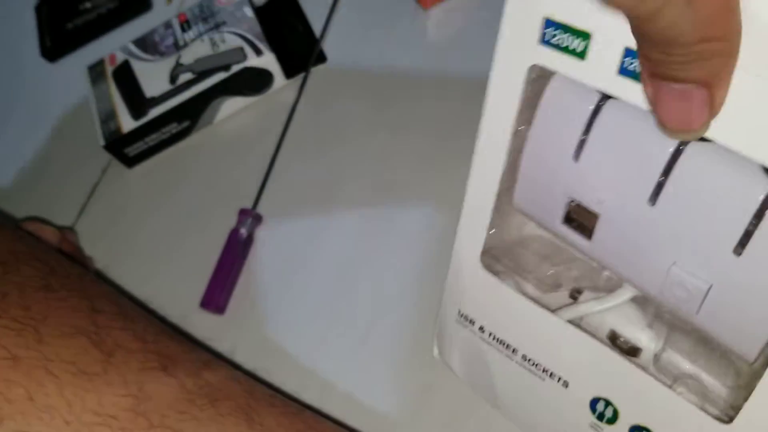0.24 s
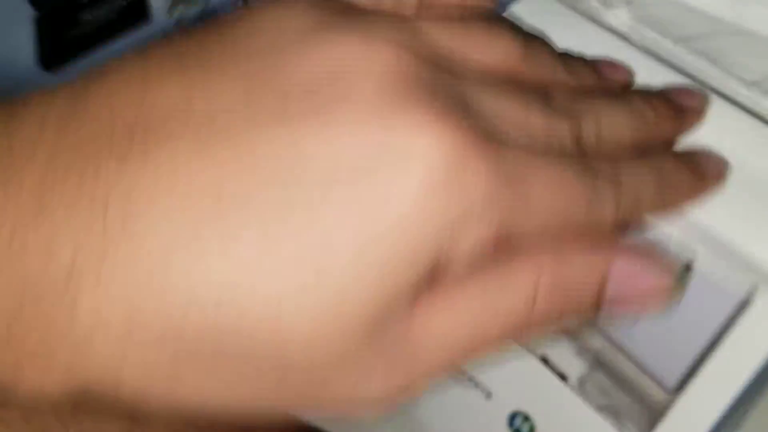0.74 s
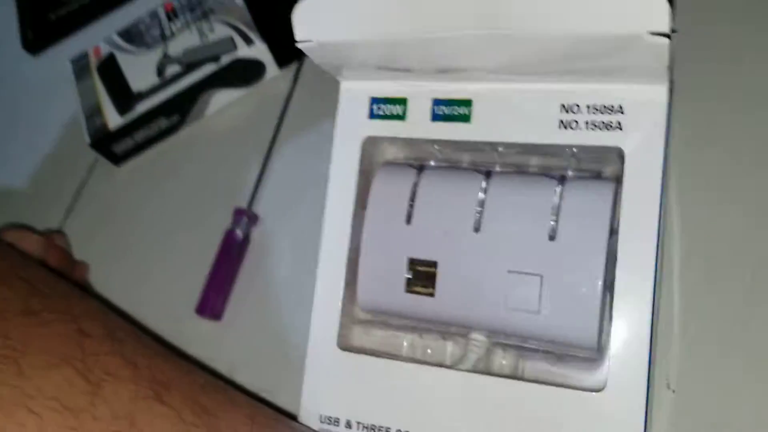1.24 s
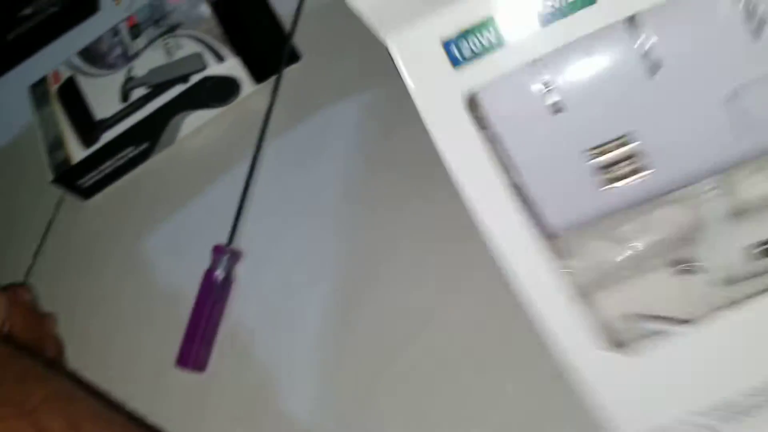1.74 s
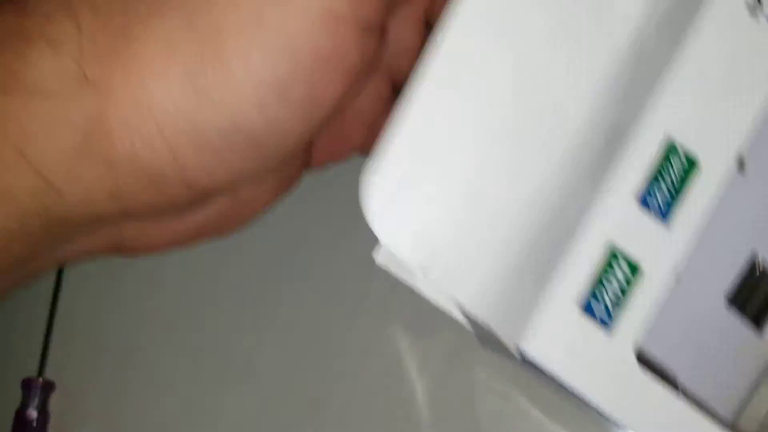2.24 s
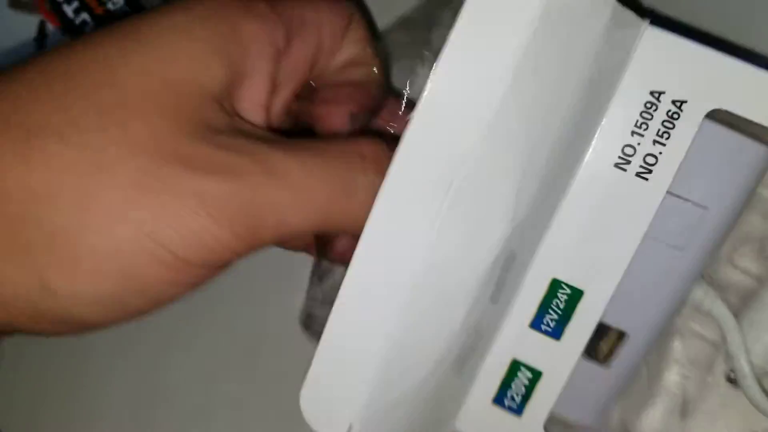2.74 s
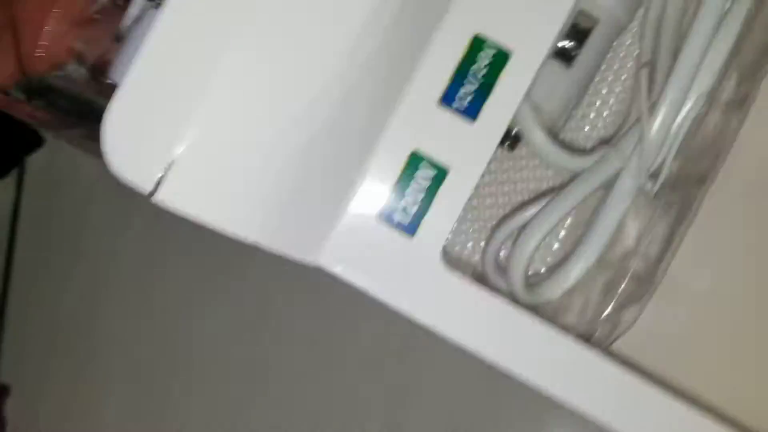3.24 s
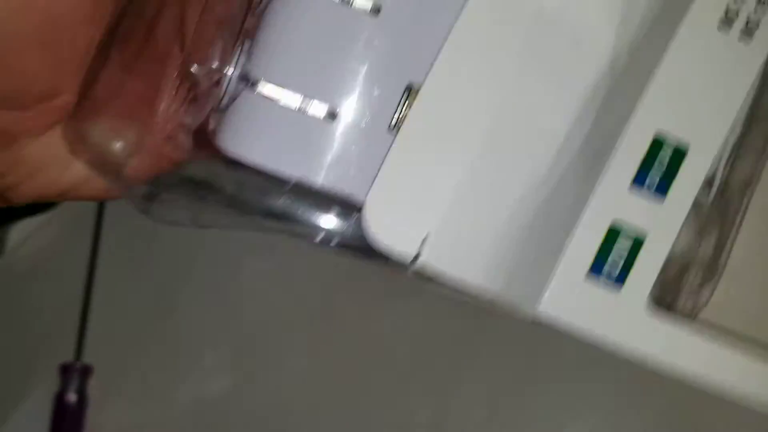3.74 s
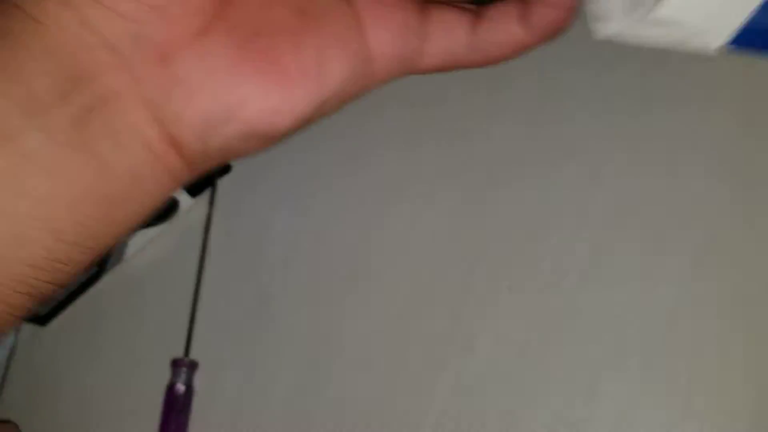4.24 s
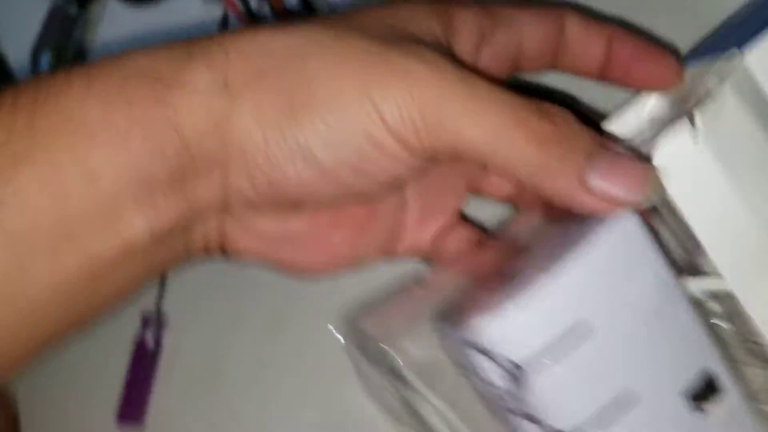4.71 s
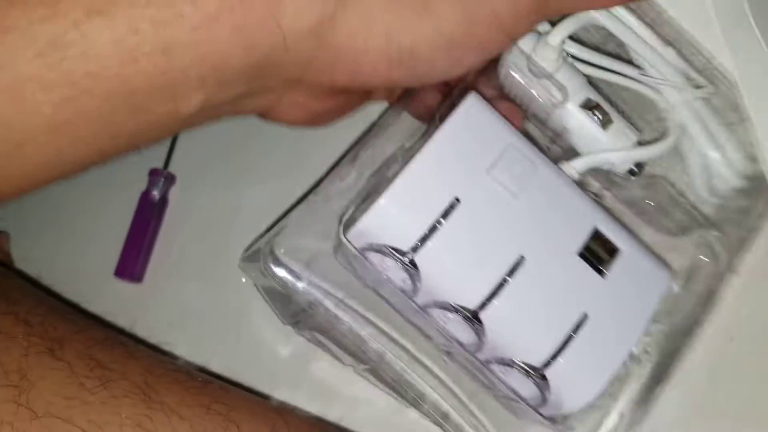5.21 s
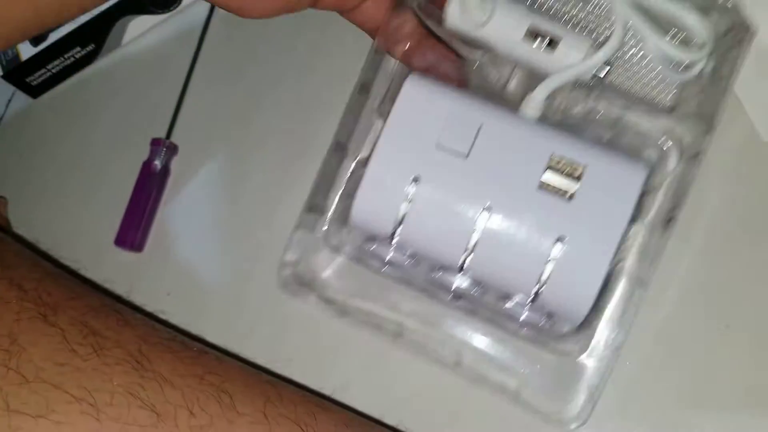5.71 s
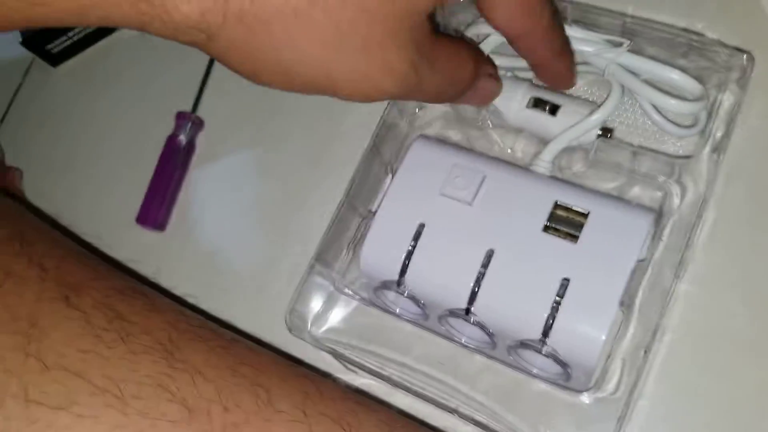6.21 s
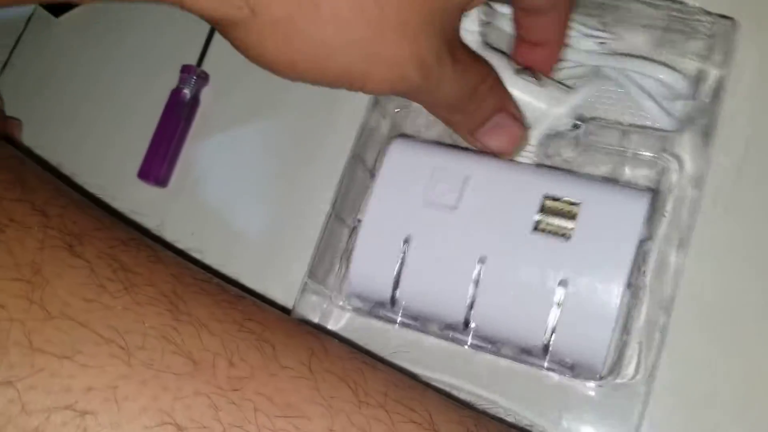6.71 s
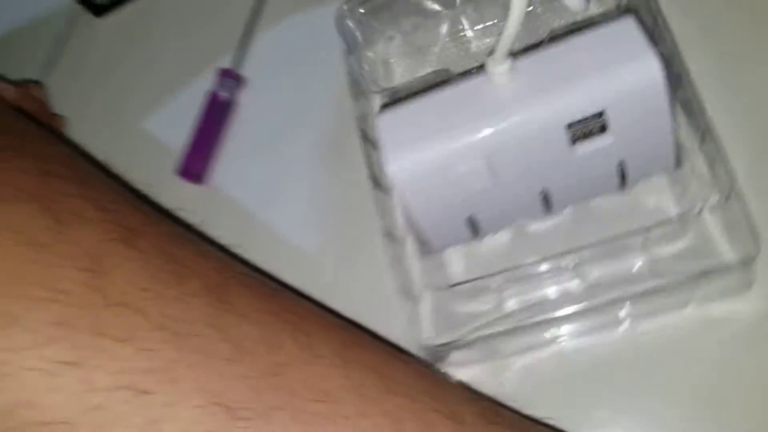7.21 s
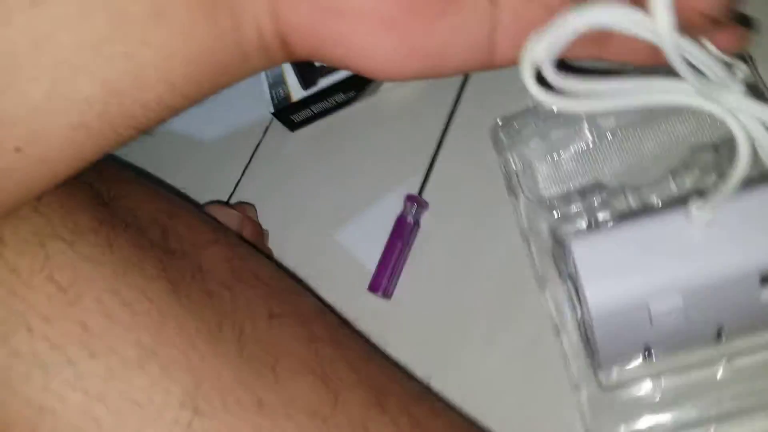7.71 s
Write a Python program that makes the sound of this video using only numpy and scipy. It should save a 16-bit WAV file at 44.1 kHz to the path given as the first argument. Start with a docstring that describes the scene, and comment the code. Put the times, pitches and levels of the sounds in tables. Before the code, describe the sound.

Cardboard and stiff plastic packaging are handled close to a phone microphone in a small tiled room, with a short echo and a faint electrical hum. A sharp snap, a bump and a scrape come right at the start, followed by scattered clicks and rubbing. From about 1.4 to 1.8 seconds the box gives a loud cluster of crackles with tiny squeaks. Between 2 and 4 seconds the plastic tray slides out in short scrapes and separate snaps, with a hollow bump near 3.4 seconds. After a brief lull, crackling builds from 4.5 seconds, and at 5 seconds the tray is set down with a loud knock and a short low drag. More snaps follow until about 5.9 seconds. From 6.4 to 7 seconds fingers pick at the plastic in quick clicks, then only soft rubbing and a few light ticks remain until about 8 seconds.

```python
"""A stiff clear plastic tray is slid out of a cardboard box, set down and picked at.
Card and plastic buckle in snaps that die within milliseconds and shake the hollow pack. Between the
snaps the surfaces rub, scrape and now and then squeak, and the heavy contents bump about inside.
It all happens close to a phone in a small tiled room, which adds a short echo over a quiet hum."""
import sys
import numpy as np
from scipy import signal
from scipy.fft import rfft, irfft
from scipy.io import wavfile

SR = 44100
rng = np.random.default_rng(int(sys.argv[2]) if len(sys.argv) > 2 else 0)


def bounce(signal):
    """Save signal as a 16-bit WAV file at the path given by the first command-line argument."""
    frames = np.transpose(np.atleast_2d(signal))
    limited = np.clip(frames, -1, 1)
    pcm = np.round(limited * 32767).astype(np.int16)
    wavfile.write(sys.argv[1], SR, pcm)


N = 350595
TIME = np.arange(N) / SR


def gain(db):
    """Turn decibels into a number to multiply by."""
    return 10 ** (np.asarray(db) / 20)


def unit(x):
    """Scale a signal so that its average strength (rms) is 1."""
    return x / np.sqrt(np.mean(x ** 2))


def panned(x, pan_db):
    """Make the left side pan_db louder than the right; below zero, the sound leans right."""
    return x * unit(gain(np.array([[pan_db], [-pan_db]]) / 2))


def stereo_noise(size, likeness):
    """Noise for left and right: unrelated at likeness 0, the same at 1."""
    mid, side = rng.standard_normal((2, size))
    return np.sqrt((1 + likeness) / 2) * mid + np.sqrt((1 - likeness) / 2) * np.array([side, -side])


def colour(x, points, size=1024):
    """Shape a sound's tone along a curve of (Hz, dB) points."""
    hz, db = np.transpose(points)
    grid_hz = np.maximum(np.arange(size // 2 + 1) * SR / size, 1)
    curve = gain(np.interp(np.log(grid_hz), np.log(hz), db))
    cepstrum = irfft(np.log(curve))
    cepstrum[1:size // 2] *= 2  # folded forward, so the filter never rings before a hit
    cepstrum[size // 2 + 1:] = 0
    response = irfft(np.exp(rfft(cepstrum)))
    return signal.fftconvolve(x, response[None], axes=1)[:, :x.shape[1]]


def wander(rate, size):
    """A random curve, mostly within -1 to 1, that heads for a new value rate times a second."""
    knots = rng.standard_normal(int(size / SR * rate) + 2)
    return np.interp(np.arange(size) / SR * rate, np.arange(len(knots)), knots)


def add(out, start_s, x):
    """Mix a sound in at its start time."""
    i = max(int(start_s * SR), 0)
    out[:, i:i + x.shape[1]] += x[:, :max(N - i, 0)]


def hit_level(x, db):
    """Scale a hit so that its first hundredth of a second has this level."""
    return x * gain(db) / np.sqrt(np.mean(x[:, :SR // 100] ** 2))


# Where the pack is held. Each row: time in seconds, left minus right level in dB.
PACK_POSITION = [(0, -5.5), (4.6, -5.5), (4.92, -11), (5.18, -10.5), (5.35, -5), (7.95, -4.5)]


def pack_pan(s):
    """Left minus right level of the pack, in dB, at s seconds."""
    return np.interp(s, *np.transpose(PACK_POSITION))


# How hard the hands work the pack. Each row: time in seconds, rubbing in dB, rumble in dB.
HAND_EFFORT = [(0.0, -46, -50), (0.73, -54.5, -53), (1.0, -46, -47), (1.39, -48.5, -47.5),
               (1.59, -42.5, -42.5), (1.79, -44, -48), (2.26, -53.5, -59.5), (3.19, -49, -52),
               (4.27, -53, -56), (4.6, -42, -47.5), (5.05, -46, -44.5), (5.27, -47, -45.5),
               (5.47, -52.5, -52.5), (6.11, -58.5, -57), (6.4, -54.5, -50.5), (6.62, -48.5, -51),
               (7.24, -49, -46.5), (7.95, -48, -49.5)]


def handling(s):
    """The rubbing and rumble levels, in dB, at s seconds."""
    times, rub_db, rumble_db = np.transpose(HAND_EFFORT)
    return np.interp(s, times, rub_db), np.interp(s, times, rumble_db)


# The tones of rubbing: rasp, fine hiss and low rumble. Each row: frequency in Hz, level in dB.
RASP_TONE = [(50, -9.5), (200, -1.5), (550, -7), (800, 4.5), (1100, -0.5), (1500, -2), (2000, -1),
             (2800, -3), (4000, -8.5), (6000, -19), (9000, -44.5)]
HISS_TONE = [(2000, -26), (5000, 3.5), (6500, -1), (8500, -4), (11500, -3.5), (15500, -1.5), (20000, 6.5)]
RUMBLE_TONE = [(20, -39), (55, -52), (85, -22.5), (150, -7.5), (220, -8.5), (285, 6.5), (340, -5.5),
               (450, 0), (620, -15), (1200, -35)]


def rubbing(hiss_offset_db=-5):
    """Fingers, card and tray slide over each other: tiny slips rasp and hiss, and the pack rumbles."""
    rub_db, rumble_db = handling(TIME)
    slips = grains(per_second=180, spread_db=3, decay_s=0.004, steady=0.4)
    friction = stereo_noise(N, 0.14) * slips + 0.28 * chatter(count=5000)
    rasp = unit(colour(friction, RASP_TONE)) * gain(rub_db)
    fine_friction = stereo_noise(N, 0.05) * (slips + 0.51)
    hiss = unit(colour(fine_friction, HISS_TONE)) * gain(rub_db + hiss_offset_db)
    rumble = unit(colour(stereo_noise(N, 0.99), RUMBLE_TONE, size=8192))
    rumble *= gain(rumble_db + 2.4 * wander(35, N))
    return panned(rasp, -3.5) + panned(hiss, -1.15) + panned(rumble, -5.5)


def grains(per_second, spread_db, decay_s, steady):
    """The strength of friction: many tiny slips, a few much larger, over an even drag."""
    size = gain(spread_db * np.minimum(rng.exponential(size=N), 4))
    slips = (rng.random(N) < per_second / SR) * size ** 2
    power = signal.lfilter([1], [1, -np.exp(-1 / (decay_s * SR))], slips)  # each slip dies away
    return unit(np.sqrt(power / power.mean() + steady))


def chatter(count, ring_s=0.0058, spread_db=3):
    """Tiny slips each ring one brief note of the bent sheet, so the pitches keep shifting."""
    out, t = np.zeros((2, N)), np.arange(SR // 40) / SR
    rise_s = lag_range_s = 20 / SR
    fade = np.exp(-t / ring_s) * (1 - np.exp(-t / rise_s))
    for when, pitch, size, lag in rng.random((count, 4)):
        hz = 600 + 6400 * pitch ** 1.5
        lead_s = np.array([[0], [lag_range_s * (lag - 0.5)]])  # the right side is early or late
        strength = gain(-spread_db * np.log(1 - 0.98 * size))
        add(out, when * N / SR, strength * np.sin(2 * np.pi * hz * (t + lead_s)) * fade)
    return unit(out)


def hum(hz=60, db=-75):
    """Mains electricity hums faintly, wavering in level."""
    tone = unit(np.sin(2 * np.pi * hz * TIME))
    return panned(gain(db + 1.1 * wander(7.6, N)) * tone, -7)


# The tones of a snap: the hollow pack's boom, the bending panel, a sharp crack and a high sizzle.
# Each row: frequency in Hz, level in dB.
BODY_TONE = [(50, -41.5), (130, -19.5), (210, -7.5), (290, 3.5), (420, 0.5), (620, -5.5), (900, -17.5),
             (2000, -70)]
PANEL_TONE = [(200, -39.5), (550, -11), (800, 5), (1050, -3), (1400, 3.5), (1900, -1), (2900, -1),
              (3600, -9), (7000, -65.5)]
CRACK_TONE = [(1200, -74.5), (2700, -4), (3400, 3), (5000, 3), (6500, 0), (8000, -11), (12000, -29.5)]
SIZZLE_TONE = [(3000, -89), (7000, -1.5), (8700, -3), (11500, 4), (15500, 1.5), (20000, -8)]
# The loud buckles and taps. Each row: start in seconds, level in dB, ringing pitch in Hz, then body,
# crack and sizzle in dB compared with that level, and the share of the panel's sound that rings (0-1).
BUCKLES = [(0.0133, -20, 1870, -4, -9, -15, .05), (0.0421, -25.5, 840, -13, -7, -19, .5),
           (0.0515, -32, 990, -15, -5, -18, 0.85), (.265, -40.5, 1810, -7, -8, -22, 0.27),
           (0.2918, -36, 1290, -12, -16, -26, 0.31), (.3119, -27.5, 3170, -18, -6, -18, .3),
           (0.3678, -25.5, 1340, -10, -3, -1, 0.43), (0.3827, -22.5, 3020, -14, -6.5, -12, 0.09),
           (0.8739, -33.5, 2080, -3, -8, -25, .1), (0.9659, -28, 1350, 1.5, -11, -23, 0.5),
           (.9726, -25, 850, -14, -16, -26, 0.54), (1.0022, -31.5, 950, -3, -10.5, -13, 0.45),
           (1.0624, -39, 1650, -11, -6.5, 0, 0.16), (1.1946, -34, 1830, -5.5, -11, -6.5, .35),
           (1.3794, -32.5, 1770, 1, -20, -25, 0.41), (1.3878, -27, 1680, -8, -14, -16, 0.5),
           (1.3929, -23.5, 1470, -8, -15, -12, 0.19), (1.461, -32, 1770, -10, -1, -10, .1),
           (1.5014, -24.5, 2420, -25, -3, -4, 0.17), (1.5362, -23.5, 3320, -12, -12, -23, .1),
           (1.5473, -25, 1840, -18, -10, -18, 0.4), (1.669, -28.5, 1280, -26, -6, -6, .05),
           (1.6766, -15, 2480, -19, -15, -14, .7), (1.695, -15.5, 2410, -29, -13.5, -34, 0.59),
           (1.7114, -22, 1415, -12, -22, -25, 1), (1.7506, -18.5, 1410, -16, -8, -2.5, 0.94),
           (1.9686, -33, 1540, -13, -20, -30, .75), (2.049, -21.5, 1590, -12.5, -14, -25, 0.24),
           (2.2578, -26.5, 3170, -8, -9.5, -21, 0.12), (2.4487, -34, 840, -10, -12.5, -12, 0.28),
           (2.697, -34.5, 2190, -27, -7, -13, .5), (2.9041, -25, 1520, -21, -3.5, -8.5, 0.27),
           (2.9717, -33.5, 2700, -14, -4.5, -7, 0.17), (3.0193, -32.5, 770, -8, -12, -30, 0.52),
           (3.0314, -30.5, 735, -6.5, -12, -18, 0.54), (3.218, -20.5, 2330, -14.5, 3.5, 0, 0.4),
           (3.328, -33, 2930, -25, -7.5, -23, .15), (3.3456, -29.5, 900, -4, -10, -19, 0.55),
           (3.371, -28, 3110, -13, -4.5, -19, .8), (3.5211, -36, 2540, -10, -14, -29, 0.85),
           (3.6887, -31, 830, -12, -12, -16, 0.78), (3.723, -40.5, 2400, -5, -7, -9, 0.43),
           (3.7425, -39, 1450, -14, -12, -28, 0.35), (3.8848, -34, 2880, -8.5, -1.5, -5, .3),
           (3.9481, -36, 1480, -13, -6, -13, 0.11), (4.1117, -45.5, 1000, -13, -16, -28, .55),
           (4.4597, -38.5, 1110, 1, -3.5, -6, 0.9), (4.563, -40, 930, -8, -3, -10, 1),
           (4.657, -27, 3320, -20, 2, 2, .1), (4.6629, -26, 2210, -4, 5, -1, 0.36),
           (4.748, -31.5, 2870, -10, -4.5, -26, 0.74), (4.9102, -27, 2940, -4, -12, -29, 0.82),
           (4.946, -33, 2350, -17, -11, -24, .3), (4.9753, -17, 3070, -3.5, -12, -17, .4),
           (4.981, -26, 820, -6, -23, -27, 1), (4.995, -23.5, 2970, -29, 6.5, -4, 0.78),
           (5.118, -31, 800, -16, -14, -33, 0.43), (5.1705, -24.5, 2350, -8.5, 7, -5, 0.57),
           (5.3388, -27.5, 910, -6.5, -10, -18, 0.55), (5.344, -28.5, 3080, -5, 6, -4.5, 0.37),
           (5.388, -29, 960, -1.5, -16, -19, 0.78), (5.403, -30, 810, -5, -30, -24, 0.4),
           (5.5925, -33, 2850, -4, -15, -25, 0.054), (5.7324, -36, 1376, -9, -7, -6.5, .55),
           (5.799, -26, 3000, -7.5, -1.5, -8, 0.45), (5.826, -31, 1460, -9, -6, -8, .2),
           (5.8734, -21, 1030, -10, -6.5, -12, 0.11), (6.154, -42, 2130, -5.5, -14, -19, 0.11),
           (6.3633, -38.5, 2760, -21, -9, -22, .4), (6.3828, -31, 2820, -24, -11.5, -27, 0.53),
           (6.4075, -30, 3010, -10.5, -2, -9.5, .3), (6.476, -33, 1350, -0.5, -11, -22, .25),
           (6.5018, -27.5, 2860, -7, -1, -20, 0.44), (6.5279, -28.5, 910, -2, -4, -15, .1),
           (6.582, -35.5, 1525, -9, -5, -21, 0.66), (6.6135, -38.5, 2520, -3, -7, -13, 0.39),
           (6.705, -26.5, 950, -6.5, -12, -20, 0.4), (6.727, -29, 3000, -23, -0.5, -16, 0.09),
           (6.7525, -29, 1284, -4, -8, -28, 0.33), (6.7751, -30, 1460, -15, 2, 1.5, 0.31),
           (6.8108, -34, 2860, -6, -11, -26, 0.48), (6.869, -26.5, 2760, -7, -4, -27, .3),
           (6.8982, -35, 1320, -24, -4.5, -11, .3), (6.999, -35, 1850, -6.5, -10, -16, .2),
           (7.4271, -49.5, 1370, -13, 2, -1, .15), (7.5744, -41.5, 1420, -8, -8, -9, .2),
           (7.7495, -36.5, 2100, -6, -8, -12.5, 0.17)]


def snaps(middling_decay_s=0.0018, middling_db=-28, halving_db=25, body_s=0.0086):
    """A buckle shakes the sheet in a burst of noise; one note stands out and the hollow pack booms."""
    out, t = np.zeros((2, N)), np.arange(SR // 14) / SR
    flutter = gain(-23) * np.exp(-t / 0.018)  # the rest of the sheet shivers on
    for s, db, hz, body_db, crack_db, sizzle_db, ring_share in list(BUCKLES) + crinkles():
        decay_s = middling_decay_s * 2 ** ((middling_db - db) / halving_db)  # harder is over sooner
        onset = 1 - np.exp(-(t / (0.38 * decay_s)) ** 2)  # a slow buckle also starts softly
        fade = onset * (np.exp(-t / decay_s) + flutter)
        ring_fade = onset * np.exp(-t / (1.84 * decay_s))
        body_fade = onset * np.exp(-t / body_s)
        phase = 2 * np.pi * np.cumsum(hz * (1 + 0.029 * wander(890, len(t)))) / SR
        ring = hit_level((np.sin(phase) * ring_fade)[None], 0)
        panel = hit_level(colour(stereo_noise(len(t), 0.35) * fade, PANEL_TONE), 0)
        body = hit_level(colour(stereo_noise(len(t), 0.96) * body_fade, BODY_TONE), body_db)
        crack = hit_level(colour(stereo_noise(len(t), 0.054) * fade, CRACK_TONE), crack_db)
        sizzle = hit_level(colour(stereo_noise(len(t), 0.054) * fade, SIZZLE_TONE), sizzle_db)
        sheet = np.sqrt(ring_share) * ring + np.sqrt(1 - ring_share) * panel + body + crack
        add(out, s, gain(db) * (panned(sheet, pack_pan(s)) + panned(sizzle, 0.26 * pack_pan(s))))
    return out


def strain(swell_s=0.0018, offset_db=-14):
    """Each loud snap opens with a creak of a few milliseconds, just before the sheet gives way."""
    levels, t = np.zeros((3, N)), np.arange(SR // 80) / SR
    swell = np.exp((t - t[-1]) / swell_s)
    for s, db, _, _, crack_db, sizzle_db, _ in BUCKLES:
        peaks = gain(db + offset_db + np.array([0, crack_db, sizzle_db]))
        add(levels, s - t[-1], np.outer(peaks, swell))
    noise = stereo_noise(N, 0.67)
    tones = (PANEL_TONE, CRACK_TONE, SIZZLE_TONE)
    return sum(level * unit(colour(noise, tone)) for level, tone in zip(levels, tones))


def crinkles(count=26, low_hz=798, high_hz=3130, body_db=-7.5, crack_db=-6.5, sizzle_db=-8):
    """Faint buckles at random moments, as strong as the hands press; gives rows like those in BUCKLES."""
    rows = []
    for when, force, pitch, ringing in rng.random((count, 4)):
        s = when * N / SR
        rub_db, _ = handling(s)
        db = rub_db + 0.5 + 3 * (2 * force - 1)  # just above the rubbing, give or take 3 dB
        hz = low_hz * (high_hz / low_hz) ** pitch
        rows.append((s, db, hz, body_db, crack_db, sizzle_db, 0.3 * ringing))
    return rows


# Bumps inside the pack. Each row: start in seconds, pitch in Hz, level in dB, decay time in seconds.
BUMPS = [(0.013, 265, -31, 0.011), (3.373, 236, -25, 0.0066), (4.977, 270, -17, 0.008),
         (5.158, 228, -35, 0.017), (6.526, 448, -30, 0.014)]


def thuds():
    """The heavy contents bump the box and ring its lowest note."""
    out, t = np.zeros((2, N)), np.arange(SR // 8) / SR
    for s, hz, db, decay_s in BUMPS:
        onset = 1 - np.exp(-2 * hz * t)
        boom = np.sin(2 * np.pi * hz * t) * onset * np.exp(-t / decay_s)
        add(out, s, panned(gain(db) * boom, pack_pan(s)))
    return out


# Scrapes of card, tray and fingers. Each row: time of the hardest push in seconds, length in seconds,
# level in dB, hiss in dB compared with that level.
SCRAPES = [(0.042, 0.042, -29, -11.5), (0.178, 0.026, -40, -23), (0.316, 0.016, -36.5, 6),
           (0.387, 0.026, -34, -7), (0.703, 0.02, -42.5, 0.5), (0.879, 0.089, -36.5, -4),
           (0.939, 0.02, -40.5, -5), (0.971, 0.044, -31.5, -26), (1.204, 0.015, -40.5, -12),
           (1.277, 0.017, -49.5, 6.5), (1.418, 0.053, -28.5, -7.5), (1.51, 0.021, -28, -12),
           (1.55, .042, -31.5, -8.5), (1.667, 0.026, -31.5, -12), (1.785, 0.052, -42.5, 9),
           (2.013, 0.021, -56, 6), (2.271, 0.028, -31.5, -13.5), (2.347, 0.054, -50.5, 2),
           (2.501, 0.069, -40.5, -13.5), (2.719, 0.039, -31.5, -18.5), (2.858, 0.02, -44, 0.5),
           (2.922, 0.048, -42, -1), (3.038, 0.032, -33, -1.5), (3.1, 0.026, -36.5, -8),
           (3.236, 0.032, -34.5, -4), (3.357, 0.019, -34, -19), (3.509, 0.073, -42, -10),
           (3.782, 0.073, -42.5, -5), (3.973, 0.045, -43, -10), (4.238, 0.034, -50, -4),
           (4.358, 0.033, -40.5, -6), (4.459, .025, -37, -17), (4.665, 0.047, -28.5, -12),
           (4.732, 0.039, -37.5, -15), (4.914, 0.051, -30, -15), (5.154, 0.069, -29, -12.5),
           (5.4, 0.024, -35, -21), (5.85, 0.058, -44, -26), (6.521, .07, -35, -11),
           (6.725, 0.043, -31, -16), (7.155, 0.043, -44.5, -10)]


def scrapes(swell_share=0.37, body_db=-6):
    """A push swells and dies; its gritty slips rasp, hiss and shake the hollow pack."""
    push, hiss_level = np.zeros((2, N))
    for s, length_s, db, hiss_db in SCRAPES:
        swell_s, fade_s = swell_share * length_s, (1 - swell_share) * length_s
        near = slice(max(int((s - 0.2) * SR), 0), int((s + 0.3) * SR))
        from_peak_s = TIME[near] - s
        stroke = gain(db) * np.exp(-np.maximum(-from_peak_s / swell_s, from_peak_s / fade_s))
        push[near] += stroke
        hiss_level[near] += gain(hiss_db) * stroke
    slips = grains(per_second=700, spread_db=2.5, decay_s=0.00089, steady=0.14)
    friction = stereo_noise(N, 0.31) * slips + 0.71 * chatter(count=4500)
    rasp = unit(colour(friction, RASP_TONE))
    body = gain(body_db) * unit(colour(stereo_noise(N, 0.94) * slips, BODY_TONE, size=4096))
    hiss = hiss_level * unit(colour(stereo_noise(N, 0.034) * (slips + 0.2), SIZZLE_TONE))
    grit = 0.99 * np.sqrt(push * hiss_level) * unit(colour(friction, CRACK_TONE))
    lean = gain(np.array([[0.5], [-0.5]]) * pack_pan(TIME))  # left and right follow the pack
    lean /= np.sqrt(np.mean(lean ** 2, axis=0))
    return lean * (push * (rasp + body) + grit) + panned(hiss, -1.8)


# Edges that stick and sing. Each row: start in seconds, length in seconds, pitch in Hz, level in dB,
# waver as a share of the pitch.
STICKING_EDGES = [(1.38, 0.018, 1840, -32.5, 0.065), (1.678, 0.033, 2400, -37, 0.074),
                  (1.76, 0.017, 1353, -29.5, 0.052), (2.387, 0.025, 10570, -46, 0.02),
                  (6.998, 0.036, 919, -35, 0.017)]


def squeaks(rough_db=4):
    """An edge sticks and slips at a wavering pitch and with uneven force."""
    out = np.zeros((2, N))
    for s, length_s, hz, db, waver in STICKING_EDGES:
        size = int(length_s * SR)
        progress = np.arange(size) / size
        phase = 2 * np.pi * np.cumsum(hz * (1 + waver * wander(900, size))) / SR
        force = np.sqrt(progress) * (1 - progress) * gain(rough_db * wander(524, size))
        add(out, s, panned(gain(db) * unit(np.sin(phase) * force), pack_pan(s)))
    return out


def drag(peak_s=5.03, swell_s=0.21, db=-45):
    """The loaded tray is pushed along the floor and rumbles."""
    rumble = colour(stereo_noise(N, 0.93), [(20, -14), (110, -7.5), (220, 0), (700, -38)], size=4096)
    swell = np.exp(-((TIME - peak_s) / swell_s) ** 2)
    return panned(gain(db) * unit(rumble) * swell, -7)


# The tiled room's echo. Each row: middle of a band in Hz, seconds to fade by 60 dB, level in dB.
ECHO_BANDS = [(149, 0.14, -8), (298, 0.32, -5.5), (610, 0.27, -6), (1180, 0.21, -3.5), (2330, 0.27, -6),
              (4900, 0.49, -9.5), (9500, 0.65, -11), (15000, 0.31, -10)]


def room(x, gap_s=0.0017, early_db=4, early_s=0.015, alike_hz=900):
    """Floor and near walls answer first, then a smooth tail; low notes reach both sides alike."""
    t = np.arange(SR // 2) / SR
    hz, fade_s, db = np.transpose(ECHO_BANDS)
    log_hz = np.log(np.maximum(np.arange(len(t) // 2 + 1) * SR / len(t), 1))
    onset = 1 - np.exp(-(t / gap_s) ** 4)
    early_boost = 1 + gain(early_db) * np.exp(-t / early_s)
    response = 0
    for k, this_band in enumerate(np.eye(len(hz))):
        fade = onset * early_boost * np.exp(-np.log(1000) * t / fade_s[k])
        spectrum = rfft(stereo_noise(len(t), likeness=1 / (1 + (hz[k] / alike_hz) ** 2)))
        band_shape = np.sqrt(np.interp(log_hz, np.log(hz), this_band))
        band = irfft(spectrum * band_shape, len(t))
        response += gain(db[k]) * band * fade / np.sqrt(np.sum(fade ** 2))
    return signal.fftconvolve(x, response, axes=1)[:, :N]


def scene():
    """The pack's short sounds and their echo, over the rubbing, the drag and the hum."""
    pack = snaps() + strain() + squeaks() + scrapes() + thuds()
    return pack + gain(-3.5) * room(pack) + rubbing() + drag() + hum()


def record(dry, bass_hz=42, top_hz=15900, ceiling=0.9):
    """The phone loses the deepest bass, rounds off the peaks and cuts the highest treble."""
    bass_cut = signal.butter(3, bass_hz, "high", fs=SR, output="sos")
    treble_cut = signal.ellip(10, 0.2, 80, top_hz, fs=SR, output="sos")
    rounded = ceiling * np.tanh(signal.sosfilt(bass_cut, dry) / ceiling)
    return signal.sosfilt(treble_cut, rounded)


dry = scene()
out = record(dry)
bounce(out)
```